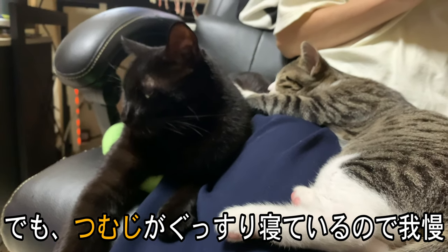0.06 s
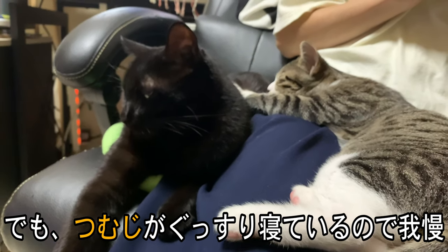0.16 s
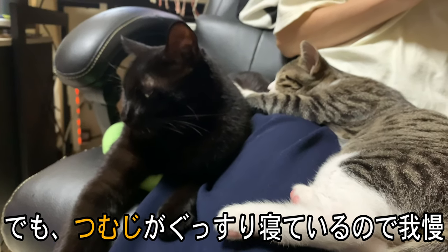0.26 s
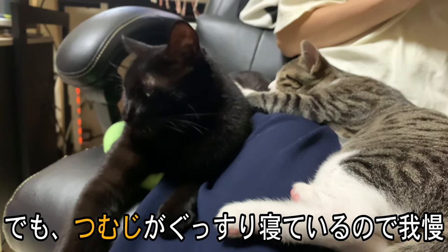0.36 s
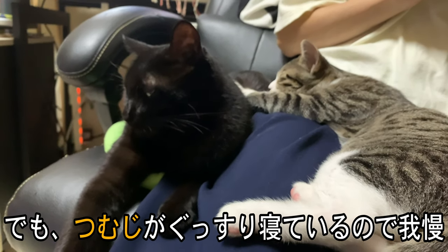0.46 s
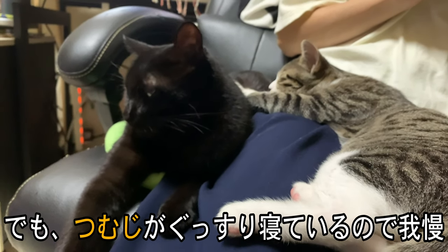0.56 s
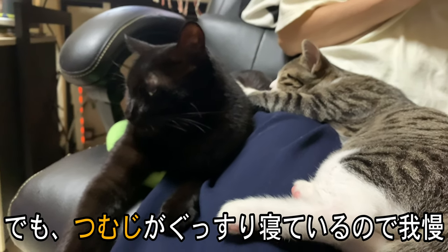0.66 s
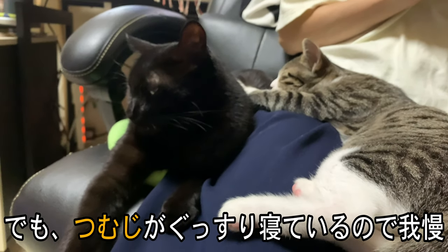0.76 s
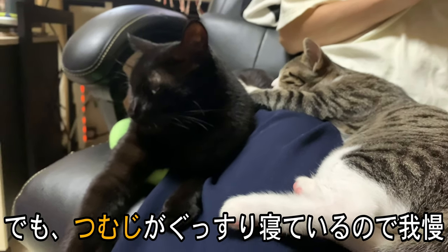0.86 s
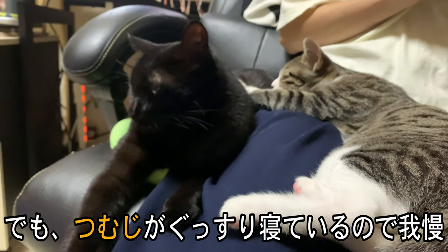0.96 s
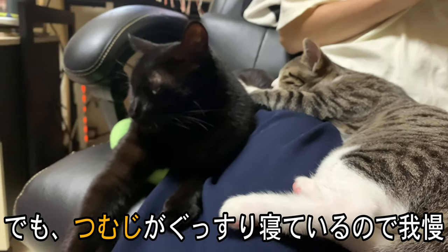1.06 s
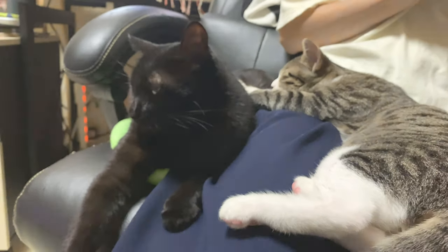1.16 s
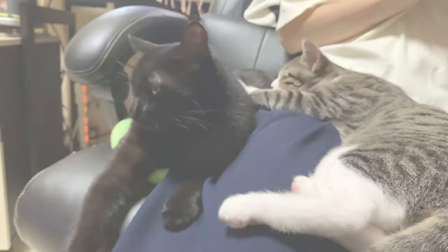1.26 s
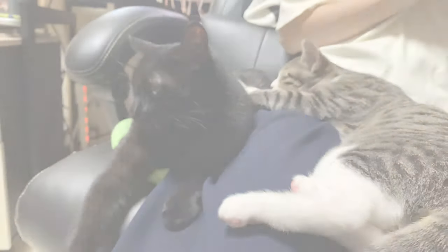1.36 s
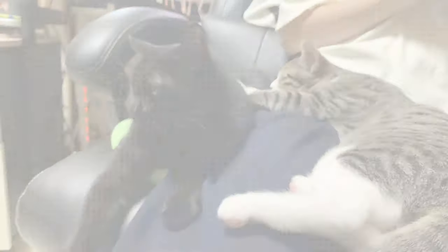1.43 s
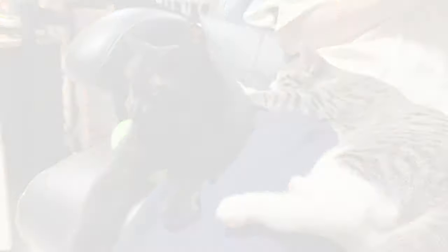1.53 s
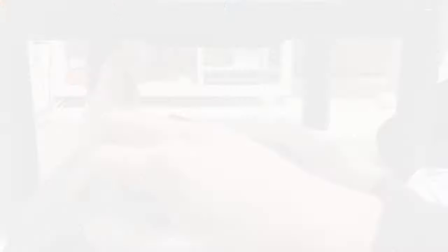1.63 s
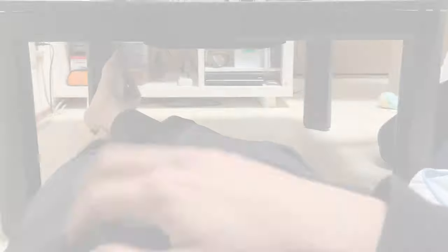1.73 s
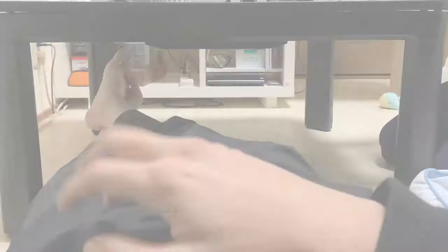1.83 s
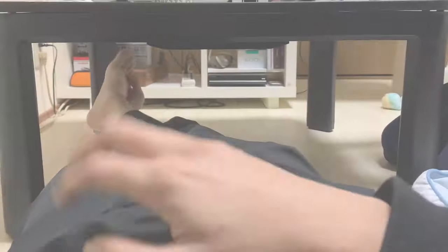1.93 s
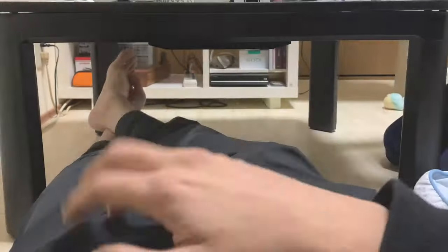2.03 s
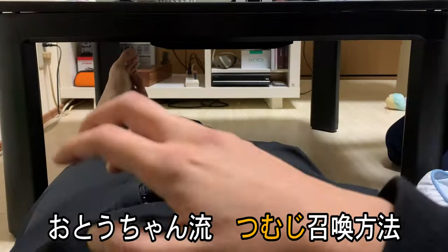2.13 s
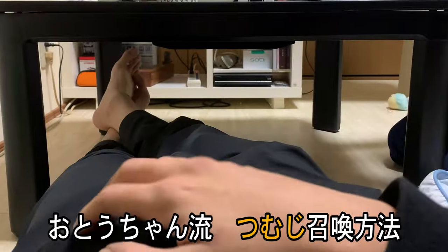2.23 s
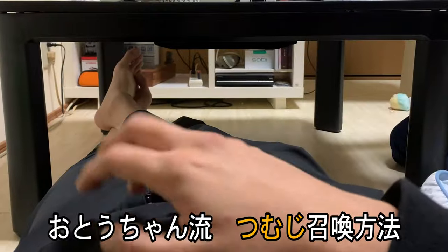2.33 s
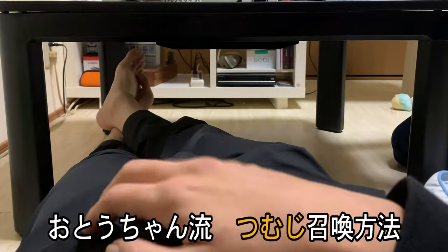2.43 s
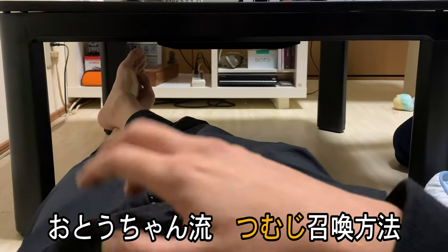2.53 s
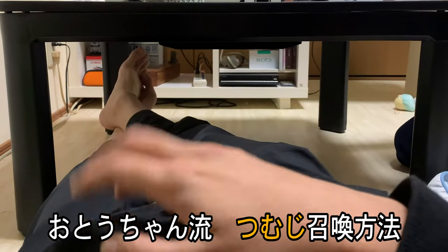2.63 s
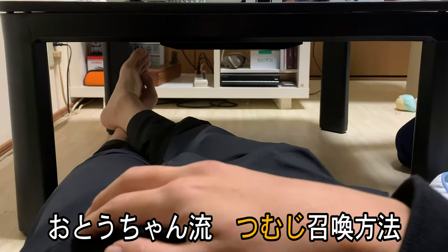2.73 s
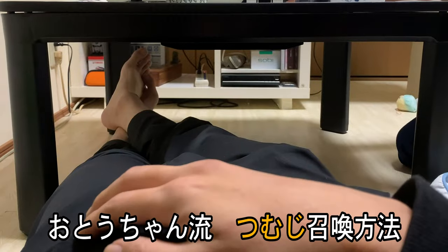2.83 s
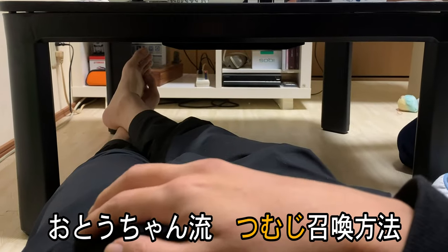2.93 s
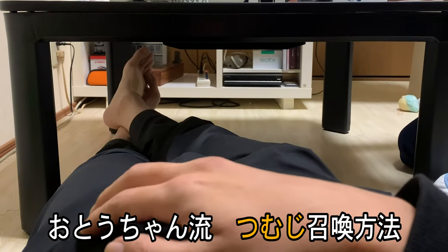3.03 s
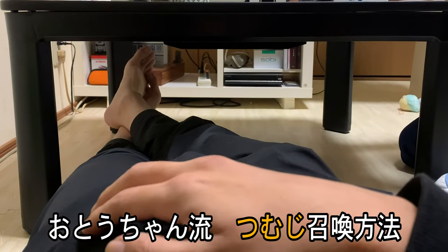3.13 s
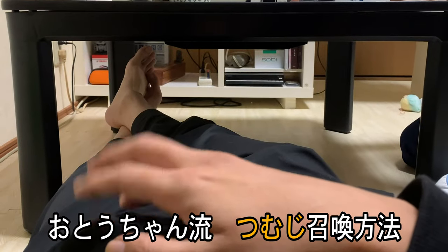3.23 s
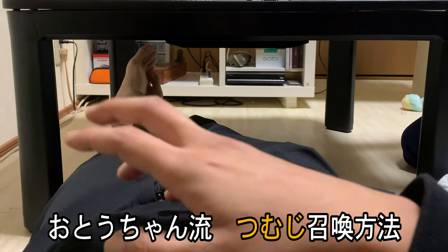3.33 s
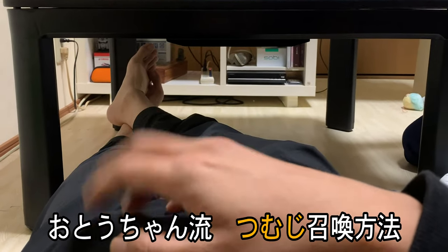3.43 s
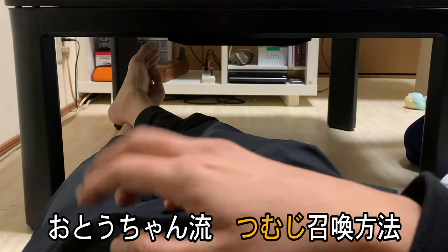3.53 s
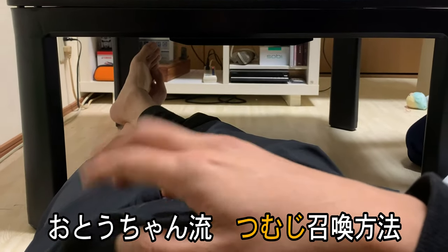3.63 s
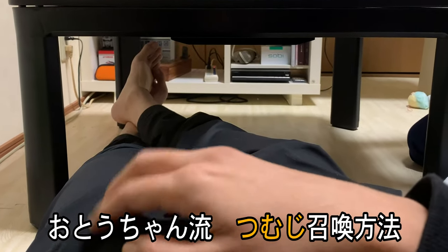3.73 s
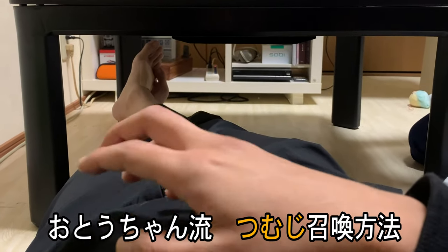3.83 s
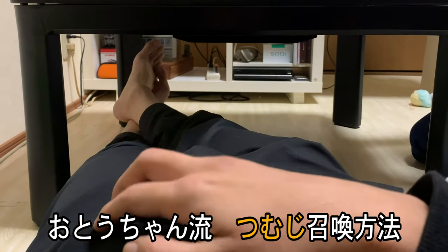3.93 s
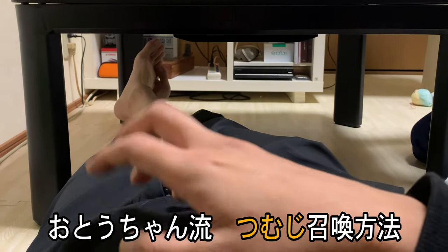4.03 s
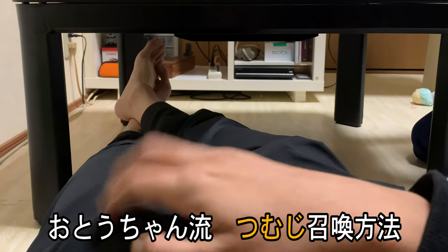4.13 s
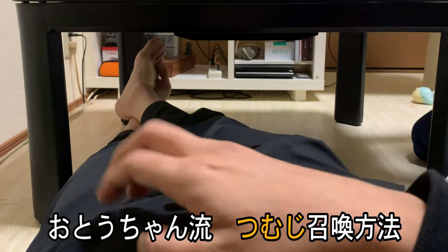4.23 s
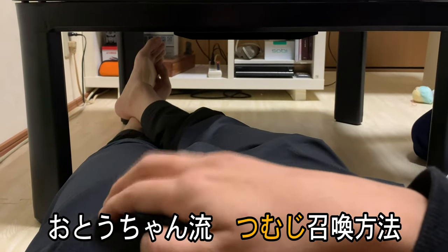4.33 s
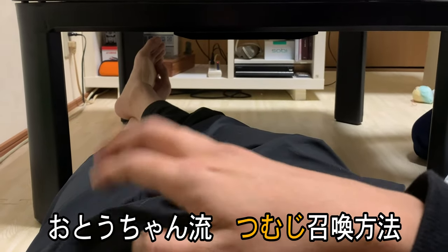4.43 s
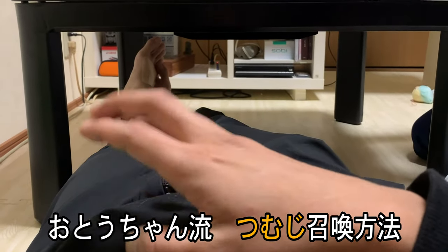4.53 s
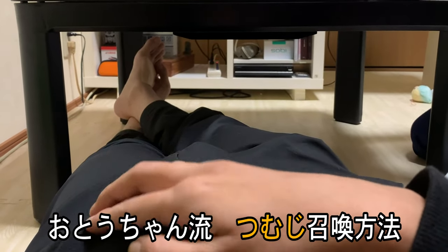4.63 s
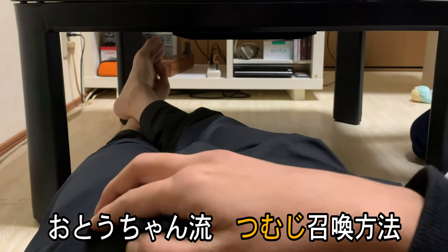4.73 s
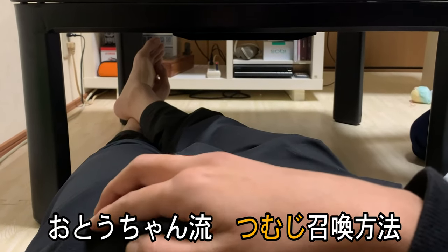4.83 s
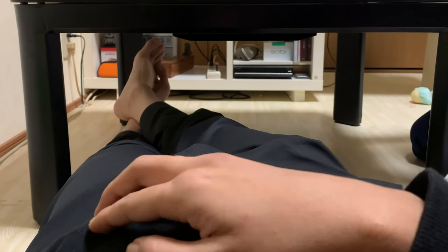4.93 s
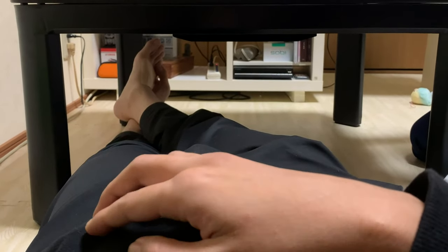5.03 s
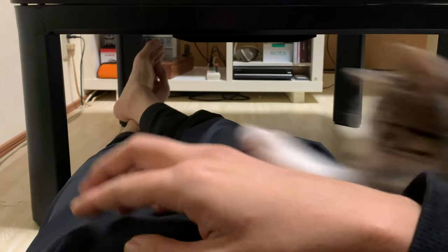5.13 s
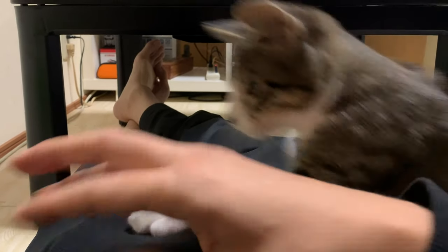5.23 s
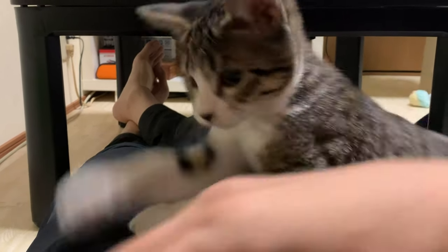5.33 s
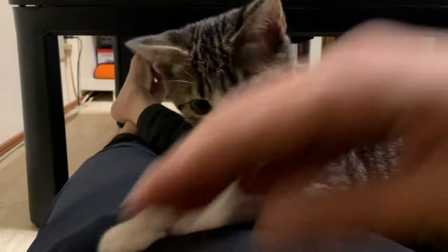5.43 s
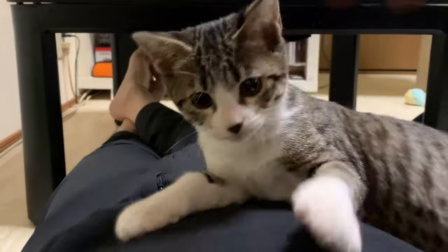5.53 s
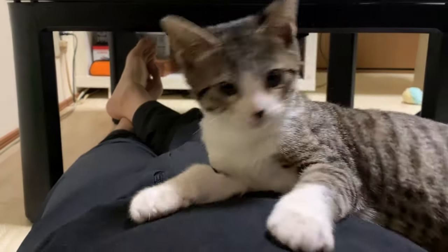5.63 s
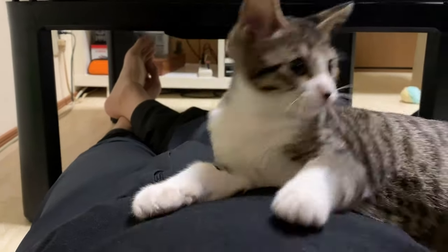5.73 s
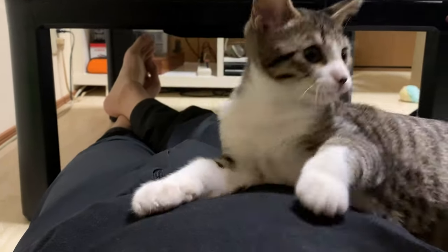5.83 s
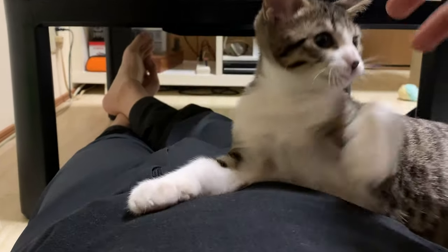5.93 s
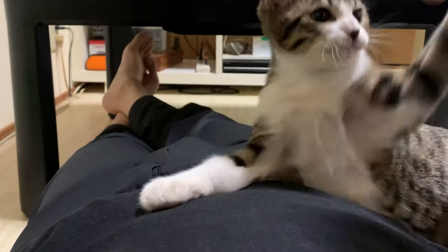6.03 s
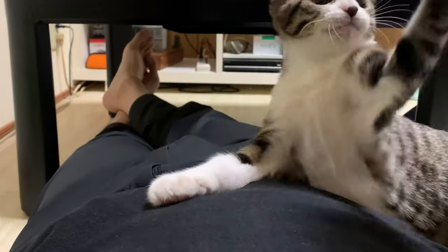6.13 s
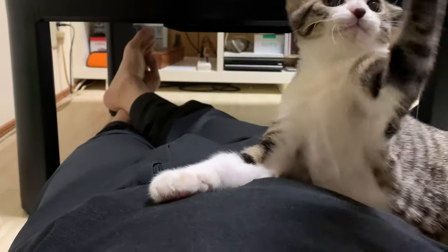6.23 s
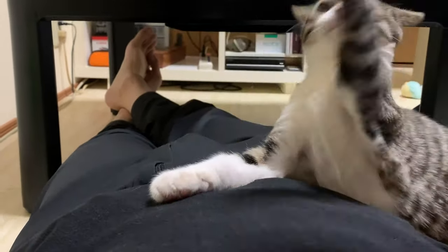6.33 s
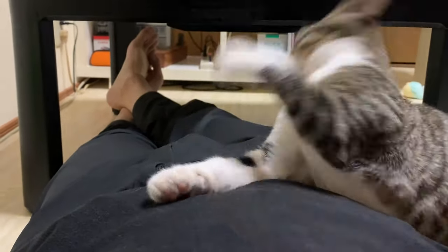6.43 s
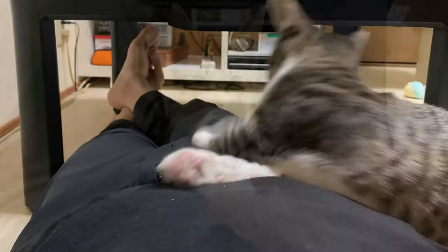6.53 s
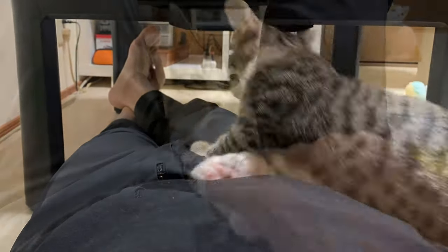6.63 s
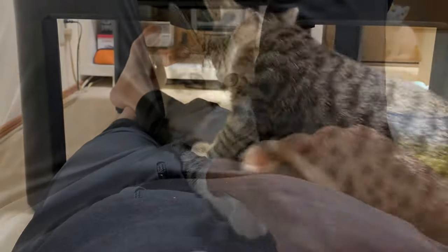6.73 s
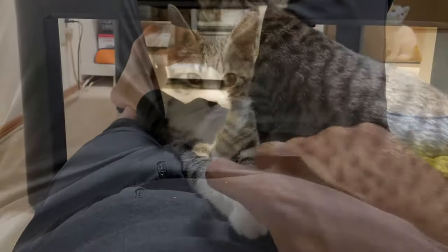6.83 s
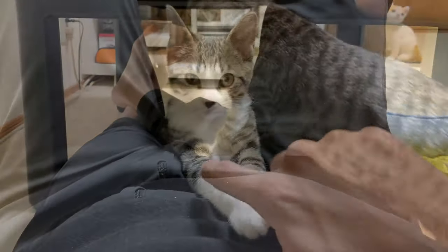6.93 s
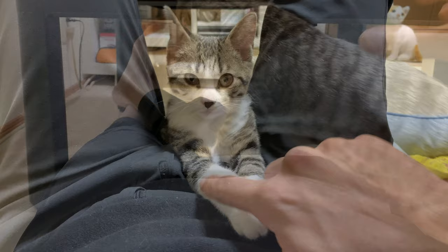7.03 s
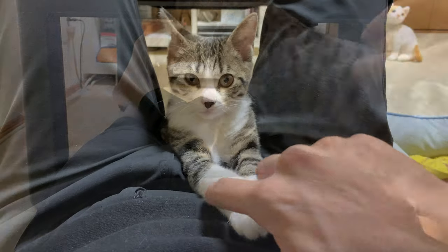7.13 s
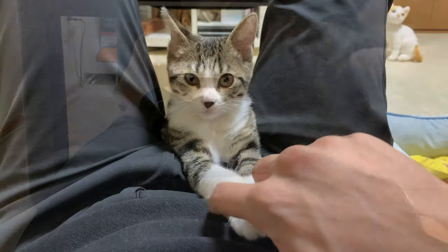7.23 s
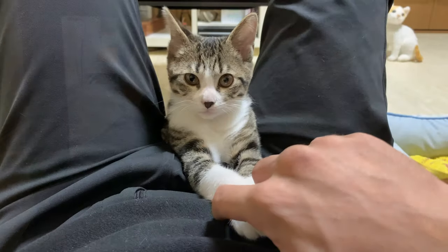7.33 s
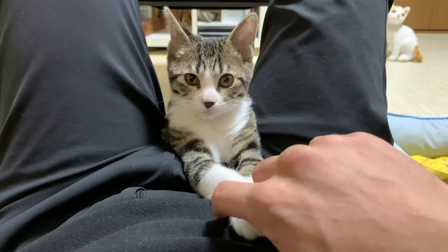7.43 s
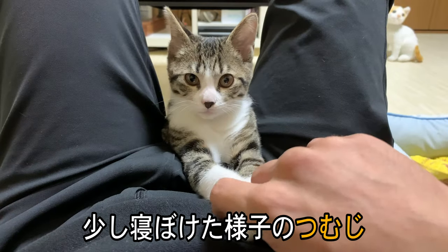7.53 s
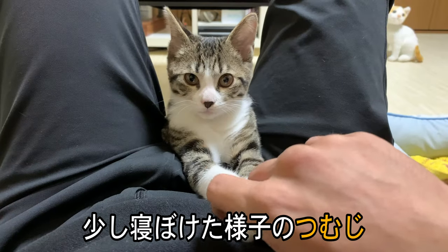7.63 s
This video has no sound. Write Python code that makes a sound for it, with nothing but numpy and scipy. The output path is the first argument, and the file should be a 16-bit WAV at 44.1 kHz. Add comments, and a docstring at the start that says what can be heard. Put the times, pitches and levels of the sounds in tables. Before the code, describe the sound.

Close to the lap in a small quiet room, low rumble and faint hiss, then a tiny dropout and a soft bump. Fingers tap trouser cloth crisply, about four per second, in two runs of six with a pause between. A cat lands with muffled thumps and rough fabric rustle, settles, and finally purrs very faintly.

```python
"""Small quiet room: fingers drum on a trouser leg in two runs of crisp taps; a very faint one follows.
Each tap is crackling cloth noise, a resonant knock, a soft push of noise and damped low thigh modes.
A cat climbs onto the lap: low modes and muffled noise for bumps, rough noise strokes for rustling cloth.
At last it purrs faintly: slow pulses through chest resonances, with a rasp of noise.
Under it lie shaped-noise rumble and hiss, and unsteady sine hums; the sound drops out once, briefly."""
import sys
import numpy as np
from scipy import signal
from scipy.fft import rfft, irfft, next_fast_len
from scipy.io import wavfile
from scipy.ndimage import uniform_filter1d, map_coordinates

SR = 44100
rng = np.random.default_rng(int(sys.argv[2]) if len(sys.argv) > 2 else 0)


def log_audio(samples):
    """Write samples as a 16-bit WAV file to the path given in sys.argv[1]."""
    # one column per channel
    frames = np.atleast_2d(samples).T
    # limit to full scale, then quantise
    limited = np.clip(frames, -1, 1)
    pcm = np.round(limited * 32767).astype(np.int16)
    wavfile.write(sys.argv[1], SR, pcm)


N = 338247

# the brief dropout: (start [s], end [s])
DROPOUT_S = (1.155, 1.203)


def amp(db):
    """Decibels to gain."""
    return 10 ** (np.asarray(db) / 20)


def unit(x):
    """Scale to rms 1."""
    return x / np.sqrt(np.mean(x ** 2) + 1e-20)


def along(points, hz):
    """(Hz, value) points read on a log-frequency axis."""
    f, v = np.transpose(points)
    return np.interp(np.log(hz + 1), np.log(f + 1), v)


def colour(points):
    """Response through (Hz, dB) points."""
    return lambda f: amp(along(points, f))


def wobble(knots_per_s):
    """Smooth random curve through normal knots."""
    knots = rng.standard_normal(int(N * knots_per_s / SR) + 4)
    return map_coordinates(knots, [np.arange(N) * knots_per_s / SR])


def filtered(x, response):
    """x times a complex response of frequency."""
    n = x.shape[-1]
    m = next_fast_len(n + SR // 10)
    return irfft(rfft(x, m) * response(np.fft.rfftfreq(m, 1 / SR)), m)[..., :n]


def resonances(modes, f):
    """Causal response of (Hz, width Hz, dB) modes, alternating in sign."""
    total = 0
    for k, (centre, width, db) in enumerate(modes):
        damping = 1j * f * width
        total = total + (-1) ** k * amp(db) * damping / (centre * centre - f * f + damping)
    return total


# diffuse sound: (frequency [Hz], left-right correlation [1])
ALIKENESS = [(50, 0.7), (150, 0.72), (300, 0.73), (600, 0.48), (1000, 0.094), (2000, 0.066)]


def diffuse(response, size=N):
    """Stereo noise of rms 1, alike in the bass and nearly unrelated in the treble."""
    def mid_side(f):
        angle = np.arccos(np.clip(along(ALIKENESS, f), -1, 1)) / 2
        return response(f) * np.array([np.cos(angle), np.sin(angle)])

    mid, side = filtered(rng.standard_normal((2, size)), mid_side)
    return unit(np.array([mid + side, mid - side]))


def burst(t, rise_s, t60_s):
    """Envelope that swells from t = 0 and dies away."""
    t = np.maximum(t, 0)
    return (1 - np.exp(-(t / rise_s) ** 2)) * 1000.0 ** (-t / t60_s)


def thud(modes, t, rise_s):
    """Damped low modes of flesh, a little different at each blow."""
    total = 0
    for hz, db, t60_s in modes:
        gain = amp(db + rng.normal(0, 1))
        mode_hz = hz * (1 + rng.normal(0, 0.019))
        total = total + gain * burst(t, rise_s, t60_s) * np.sin(2 * np.pi * mode_hz * t)
    return total


def add(track, s, sound):
    """Mix a sound into the track at time s."""
    part = track[:, round(s * SR):][:, :sound.shape[-1]]
    part += sound[..., :part.shape[1]]


def stretches(rows, blend_s):
    """Each column holds its value from one start time to the next, with a short blend."""
    starts, *cols = np.transpose(rows)
    current = np.searchsorted(starts[1:], np.arange(N) / SR)
    return [uniform_filter1d(c[current], size=round(blend_s * SR)) for c in cols]


# steady background: (start [s], rumble [dB], mains hum [dB], motor hum [dB])
BACKGROUND = [(0, -65.5, -92, -71), (1.18, -60, -59.5, -59.5), (5.75, -61.5, -76, -61.5),
              (6.92, -60.5, -57.5, -62)]
# motor partials: (frequency [Hz], relative level [dB])
MOTOR_PARTIALS = [(82.5, 1.5), (100, 0), (195, -18), (301, -12.5), (332, -23), (452, -30)]
# rumble spectrum: (frequency [Hz], relative density [dB/Hz])
RUMBLE_SPECTRUM = [(12, -40), (22, -24.5), (45, -0.5), (60, 0), (110, -3.5), (160, -6.5), (240, -14.5),
                   (320, -16), (450, -24.5), (750, -31), (1500, -34.5), (3000, -73)]
# hiss spectrum: (frequency [Hz], relative density [dB/Hz])
HISS_SPECTRUM = [(300, 12), (800, 0), (1020, 6), (1300, -2.5), (2100, 4), (2700, -2), (5200, -1),
                 (6500, -5.5), (9000, -3.5), (11000, -3), (14000, -7.5), (15000, -14), (16000, -40)]
MAINS_HZ, WHINE_HZ, WHINE_WIDTH_HZ = 120, 5180, 18
WHINE_DB, HISS_DB = -91.5, -72.5


def room():
    """Noise rumble and hiss, appliance hums as unsteady sines, a narrow noise whine until the dropout."""
    rumble_db, mains_db, motor_db = stretches(BACKGROUND, blend_s=0.1)
    t = np.arange(N) / SR

    def tone(hz):
        swell = amp(1.2 * wobble(3.3))
        return np.sqrt(2) * swell * np.sin(2 * np.pi * hz * t + 0.43 * wobble(2.95))

    mains = amp(mains_db) * tone(MAINS_HZ)
    motor = amp(motor_db) * sum(amp(db) * tone(hz) for hz, db in MOTOR_PARTIALS)
    whine_band = diffuse(lambda f: np.exp(-((f - WHINE_HZ) / WHINE_WIDTH_HZ) ** 2))
    whine = amp(WHINE_DB) * (t < DROPOUT_S[0]) * whine_band
    rumble = amp(rumble_db + 2.1 * wobble(4.6)) * diffuse(colour(RUMBLE_SPECTRUM))
    hiss = amp(HISS_DB) * diffuse(colour(HISS_SPECTRUM))
    return mains + motor + whine + rumble + hiss


# cat's chest resonances: (frequency [Hz], width [Hz], level [dB])
CHEST_MODES = [(137.4, 31.5, 6.5), (209, 130, -4.5), (338, 70, -10), (506, 160, -22), (732, 44, -15)]
PURR_S, PURR_HZ, PURR_SAG_HZ_PER_S, PURR_DB = 6.949, 24.66, 3.5, -58
LULL_S, LULL_LENGTH_S, LULL_DB = 7.49, 0.12, 6  # the purr eases once
PURR_UNEVEN_DB, RASP_DB, RASP_CYCLES = 2, -7, 0.6  # pulse scatter; rasp level and decay


def purr():
    """Slow pulses of the larynx ring the cat's chest, each with a faint rasp."""
    start = round(PURR_S * SR)
    age = np.arange(N - start) / SR
    cycle = np.cumsum(PURR_HZ - PURR_SAG_HZ_PER_S * age) / SR
    lull = np.exp(-((PURR_S + age - LULL_S) / LULL_LENGTH_S) ** 2)
    level_db = PURR_DB - LULL_DB * lull
    beats = np.flatnonzero(np.diff(np.floor(cycle), prepend=-1))
    pulses = np.zeros(len(age))
    pulses[beats] = amp(rng.normal(0, PURR_UNEVEN_DB, len(beats)))
    fur = lambda f: 1 / np.sqrt(1 + (f / 950) ** 8)  # the coat muffles the treble
    voice = unit(filtered(pulses, lambda f: resonances(CHEST_MODES, f) * fur(f)))
    rasp_spectrum = colour([(100, -22), (300, 25), (800, -2), (1200, -17), (4000, -40)])
    rasp = unit(diffuse(rasp_spectrum, size=len(age)) * np.exp(-(cycle % 1) / RASP_CYCLES))
    out = np.zeros((2, N))
    out[:, start:] = amp(level_db) * (voice + amp(RASP_DB) * rasp)
    return out


# fur strokes over cloth: (peak time [s], drag level [dB], rise [s], fall [s])
STROKES = [(5.146, -52.5, 0.044, 0.076), (5.221, -49, 0.014, 0.077), (5.296, -44.5, 0.021, 0.056),
           (5.361, -45.5, 0.069, 0.13), (5.66, -55.5, 0.19, .19), (6.048, -67, .01, .025)]
# drag spectrum: (frequency [Hz], relative density [dB/Hz])
DRAG_SPECTRUM = [(60, 4.5), (120, 2), (300, -8), (640, -9.5), (800, -20), (1100, -21.5), (2000, -19),
                 (2800, -30), (6000, -53)]
# fibre rustle spectrum: (frequency [Hz], relative density [dB/Hz])
FIBRE_SPECTRUM = [(710, -16), (1200, -9), (2400, -19), (3870, -10.5), (8630, -16.5), (10000, -17.5),
                  (11800, -16), (13500, -22), (16000, -33)]
# light brushes of fur and sleeve: (time [s], level [dB], length [s], centre [Hz], width [Hz])
LIGHT_BRUSHES = [(1.307, -59, 0.11, 337, 650), (5.154, -57.5, 0.022, 1690, 450),
                 (5.109, -66, 0.025, 1760, 700), (5.15, -70, 0.068, 7950, 5000),
                 (7.21, -77, 0.039, 3030, 890), (7.66, -72.5, .09, 2070, 2037)]
HARD_DRAG_DB, FIBRE_DB = -45, -53  # fibre level in a hard stroke
FIBRE_GROWS_DB_PER_DB, BRUSH_ROUGH_DB = 1.65, 2


def rustle():
    """Fur slides over the trousers, catching and slipping on the weave; harder strokes are brighter."""
    t = np.arange(N) / SR
    strokes = [amp(db) * np.exp(-np.maximum((s - t) / rise_s, (t - s) / fall_s))
               for s, db, rise_s, fall_s in STROKES]
    effort = np.linalg.norm(strokes, axis=0)
    catch = wobble(70)
    drag = effort * amp(2 * catch) * diffuse(colour(DRAG_SPECTRUM))
    hardness = (effort / amp(HARD_DRAG_DB)) ** FIBRE_GROWS_DB_PER_DB
    roughness_db = 1.8 * catch + 1.0 * wobble(600)
    fibres = hardness * amp(FIBRE_DB + roughness_db) * diffuse(colour(FIBRE_SPECTRUM))
    out = drag + fibres
    for s, db, length_s, hz, width_hz in LIGHT_BRUSHES:
        stroke = np.exp(-((t - s) / length_s) ** 2)
        band = diffuse(lambda f: resonances([(hz, width_hz, 0)], f) ** 2)
        out += amp(db + BRUSH_ROUGH_DB * catch) * stroke * band
    return out


# paws and hand on the lap: (time [s], thud level [dB], pat level before PAT_TRIM_DB [dB], cutoff [Hz])
LAP_BUMPS = [(.071, -75, -54.5, 800), (1.336, -42, -61, 480), (3.181, -71, -44.5, 550),
             (5.14, -34.5, -51, 400), (5.189, -55, -44.5, 650), (5.215, -48, -40, 700),
             (5.234, -41, -37, 595), (5.284, -33.5, -36.5, 796), (5.303, -24.5, -29.5, 317),
             (5.328, -32, -28.5, 1170), (5.356, -32, -52, 700), (5.453, -54, -39, 734),
             (5.602, -47.5, -46.5, 604), (5.707, -42.5, -51, 650), (5.81, -51, -48, 650),
             (6.572, -66, -52, 950), (6.863, -50.5, -53, 626)]
# lap under a heavier load: (frequency [Hz], level [dB], t60 [s])
LAP_MODES = [(69.6, 2.5, 0.21), (100, -21.5, 0.24), (158, 0, 0.11), (290, -4.5, 0.068)]
# soft contact: (frequency [Hz], relative density [dB/Hz])
PAT_SPECTRUM = [(60, -31), (150, 6.5), (300, 11), (550, 6.5), (1200, 4), (5000, -46)]
PAT_TRIM_DB = -7.5


def bumps():
    """Soft weight on the lap: damped low modes thud and lowpassed noise pats, each with its own cutoff."""
    out, t = np.zeros((2, N)), np.arange(SR // 2) / SR
    for s, thud_db, pat_db, cutoff_hz in LAP_BUMPS:
        muffled = lambda f: amp(along(PAT_SPECTRUM, f)) / np.sqrt(1 + (f / cutoff_hz) ** 8)
        envelope = burst(t, 0.0011, 0.091) + amp(-16) * burst(t, 0.0059, 0.33)
        pat = diffuse(muffled, size=len(t)) * envelope
        lap = thud(LAP_MODES, t, rise_s=0.011)
        add(out, s, amp(thud_db) * lap + amp(pat_db + PAT_TRIM_DB) * pat)
    return out


# room decay: (frequency [Hz], t60 [s])
WALL_DECAY = [(150, 0.14), (1500, 0.23), (5000, 0.2), (14000, 0.15)]


def reverb(spectrum, t):
    """The room's smooth wash after a blow of the given colour, of energy 1 on the left."""
    hz, age, z = signal.stft(diffuse(spectrum, size=len(t)), SR, nperseg=256)
    decay = 1000.0 ** (-age / along(WALL_DECAY, hz)[:, None])
    tail = signal.istft(z * decay, SR, nperseg=256)[1][:, :len(t)]
    tail = tail * np.clip(t / 0.00073 - 1, 0, 1)  # fades in from 0.73 to 1.46 ms
    return tail / np.linalg.norm(tail[0])


# echoes off the low table and the floor: (delay [s], level [dB])
TABLE_ECHOES = [(.0018, -25), (.0047, -20.5), (0.0096, -30.5)]


def under_table(x):
    """The direct sound and its first few echoes."""
    def response(f):
        return 1 + sum(amp(db) * np.exp(-2j * np.pi * f * s) for s, db in TABLE_ECHOES)

    return filtered(x, response)


def from_left(x, pan_db, lead_ms):
    """A near source on the left: louder and earlier in that channel."""
    side = np.array([[.5], [-.5]])
    return amp(side * pan_db) * filtered(x, lambda f: np.exp(2j * np.pi * f * side * lead_ms / 10 ** 3))


# finger taps: (time [s], level [dB], knock re snap before KNOCK_TRIM_DB [dB], soft push level [dB],
#               delay of next finger [s], its relative level [dB])
FINGER_TAPS = [(1.6042, -28, -0.5, -46, 0.0093, -6.5), (1.8392, -32, -2, -51.5, .0083, -23),
               (2.066, -29.5, 3.5, -47.5, 0.0056, -13), (2.2975, -32, -0.5, -56, 0.0043, -2.5),
               (2.5166, -42, 5, -48.5, 0.0068, -0.5), (2.7593, -38.5, 0.5, -55.5, 0.0083, -7),
               (3.521, -53, 3, -64, 0.018, 2), (3.732, -38.5, 8, -46, 0.012, -6),
               (3.969, -35, 0.5, -53, 0.005, -7.5), (4.2066, -29.5, -1.5, -45, 0.0061, -9.5),
               (4.4275, -40.5, 4, -54.5, 0.0043, -12), (4.695, -39.5, -4, -41.5, 0.0046, 7),
               (6.9474, -67.5, 10, -59, .002, -20)]
# nail and taut cloth: (frequency [Hz], relative density [dB/Hz])
SNAP_SPECTRUM = [(200, 2.5), (600, -3), (2000, -5.5), (2800, -2), (4500, 3.5), (5600, -3.5), (6600, 5),
                 (7800, 4), (10200, 4.5), (13000, 3.5), (14400, 4), (16000, -20)]
# hollow under the fingers: (frequency [Hz], width [Hz], level [dB])
HOLLOW_MODES = [(660, 140, -12.5), (1022, 280, -9), (1338, 150, -3.5), (1800, 285, -5.5), (2450, 70, -15.5)]
# fingertip's soft push on the leg: (frequency [Hz], relative density [dB/Hz])
PUSH_SPECTRUM = [(60, -12), (160, 0.5), (300, -2.5), (450, -12.5), (800, -19.5), (1500, -24), (5000, -64)]
# thigh: (frequency [Hz], level [dB], t60 [s])
THIGH_MODES = [(89, 6, 0.079), (120.3, 4, 0.072), (178, -4, 0.048), (276, -10, 0.062)]
SNAP_T60_S, NEXT_T60_S = 0.02, 0.027  # first and second finger
KNOCK_TRIM_DB = 8
FIRM_DB, THUD_DB, THUD_GROWS_DB_PER_DB = -28.5, -36.5, 0.66  # firm tap, thigh under it, growth
PAN_DB, DRIFT_DB_PER_S = 0.5, 1.32  # left minus right: the hand creeps to the left


def taps():
    """Two fingers land just apart: the weave crackles, the hollow knocks, the thigh thuds with the force."""
    out = np.zeros((2, N))
    t = np.arange(int(.3 * SR)) / SR - .02  # contact at t = 0
    hollow = lambda f: resonances(HOLLOW_MODES, f)
    snap_colour = colour(SNAP_SPECTRUM)
    for s, db, knock_db, push_db, delay_s, next_db in FINGER_TAPS:
        pan_db = PAN_DB + DRIFT_DB_PER_S * s
        first = burst(t, 0.00054, SNAP_T60_S)
        second = amp(next_db) * burst(t - delay_s, 0.00082, NEXT_T60_S)
        contact = np.hypot(first, second)
        graze = np.exp(-np.abs(t) / 0.0068)  # fingertip brushes loose cloth around contact
        crackle = amp(1.57 * rng.standard_normal((2, len(t))))
        fibres = unit(rng.standard_normal((2, len(t))) * crackle)
        snap = filtered((contact + amp(-35) * graze) * fibres[0], snap_colour)
        knock = filtered((contact + amp(-16.5) * graze) * fibres[1], hollow)
        knock = amp(knock_db + KNOCK_TRIM_DB) * knock

        snap_pair = from_left(snap, pan_db, lead_ms=0.1856)
        knock_pair = from_left(knock, pan_db + 6.5, lead_ms=0.26)
        near = under_table(snap_pair + knock_pair)
        snap_wash = amp(-6.0) * np.linalg.norm(snap) * reverb(snap_colour, t)
        knock_wash = amp(-4) * np.linalg.norm(knock) * reverb(hollow, t)

        push_envelope = burst(t, 0.0065, 0.068) + amp(-4.0) * burst(t, 0.0033, 0.23)
        push = diffuse(colour(PUSH_SPECTRUM), size=len(t)) * push_envelope
        thigh_db = THUD_DB + THUD_GROWS_DB_PER_DB * (db - FIRM_DB)
        thigh = amp(thigh_db) * thud(THIGH_MODES, t - .002, rise_s=0.0056)
        tap = amp(db) * (near + snap_wash + knock_wash)
        add(out, s + t[0], tap + amp(push_db) * push + thigh)
    return out


def scene():
    """Everything heard from the lap."""
    return room() + purr() + rustle() + bumps() + taps()


TOP_HZ = 16300


def record(dry):
    """The left's top treble is mostly a late copy of the right's; band limits and one brief dropout."""
    share = lambda f: np.pi / 2 * np.clip((f - 6500) / 3000, 0, .86)
    late = lambda f: np.exp(-2j * np.pi * f * .000297)
    own = filtered(dry[0], lambda f: np.cos(share(f)))
    shared = filtered(dry[1], lambda f: np.sin(share(f)) * late(f))
    highpass = signal.butter(2, 30, "high", fs=SR, output="sos")
    pair = signal.sosfilt(highpass, [own + shared, dry[1]])
    t = np.arange(N) / SR
    live = 1.0 * ((t < DROPOUT_S[0]) | (t > DROPOUT_S[1]))
    gate = uniform_filter1d(live, size=128)
    return filtered(pair * gate, lambda f: f < TOP_HZ)


dry = scene()
out = record(dry)
log_audio(out)
```